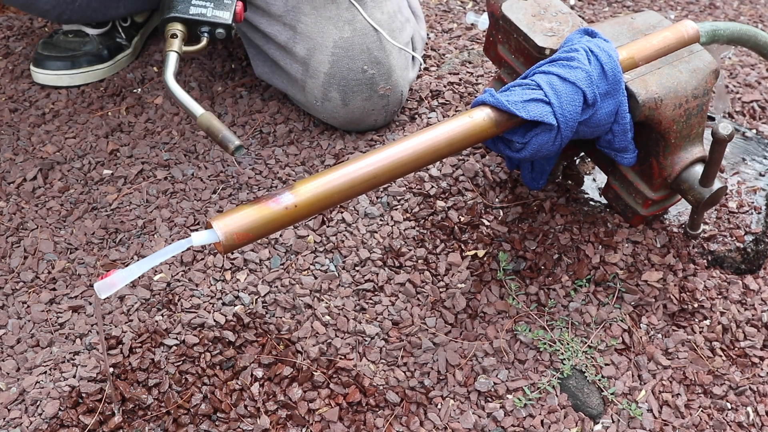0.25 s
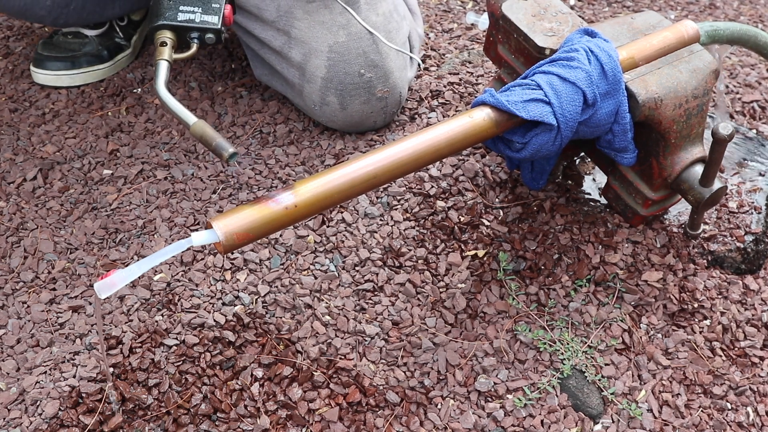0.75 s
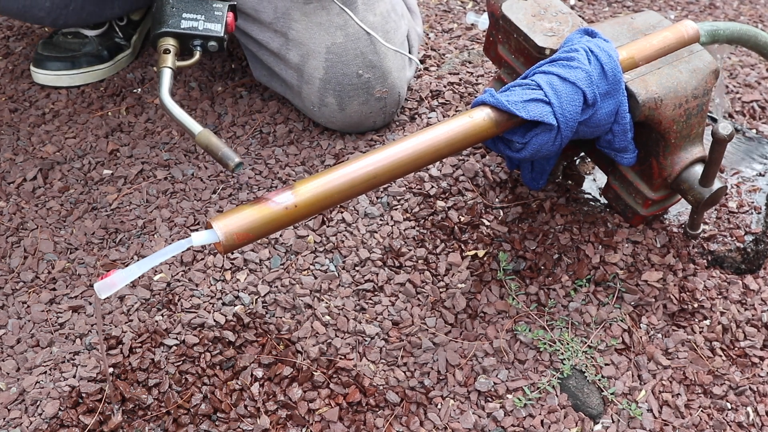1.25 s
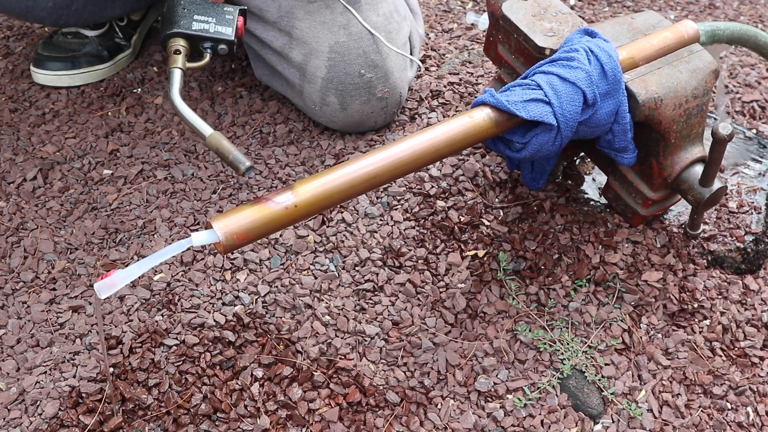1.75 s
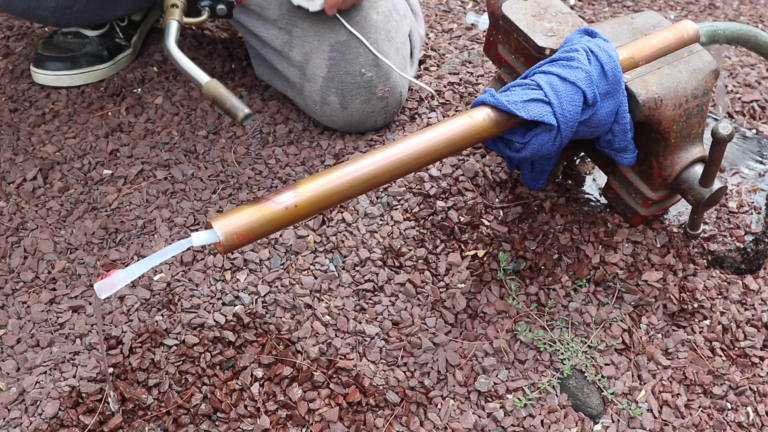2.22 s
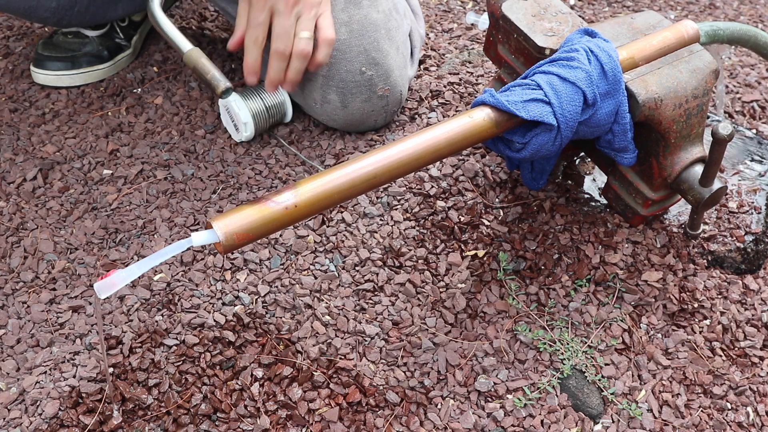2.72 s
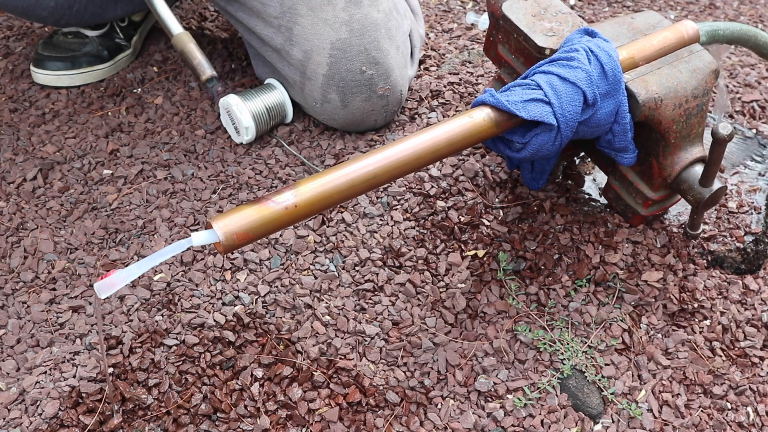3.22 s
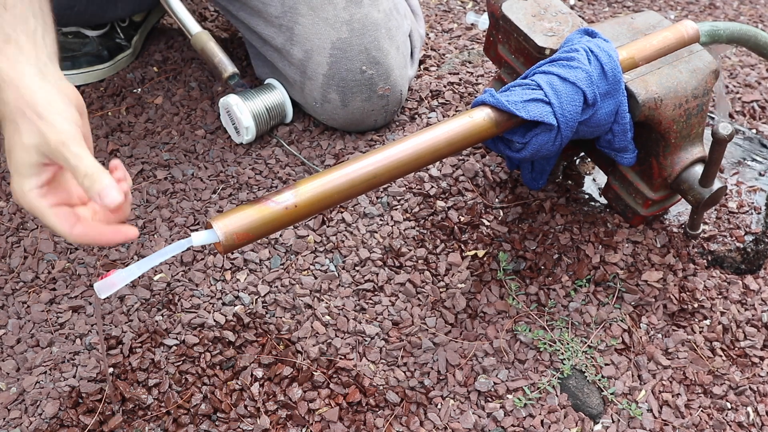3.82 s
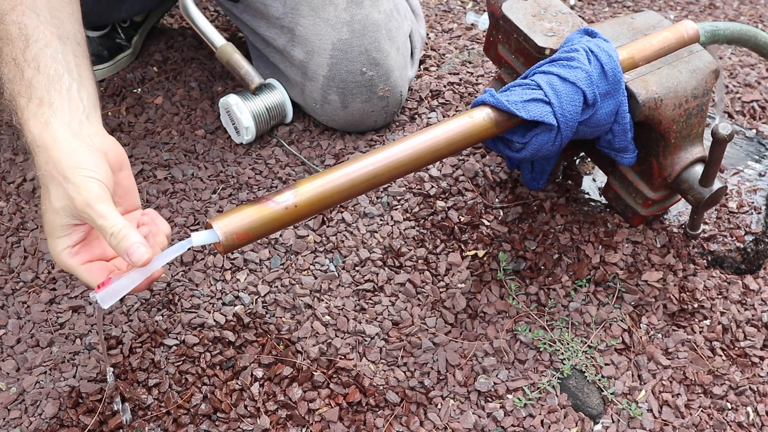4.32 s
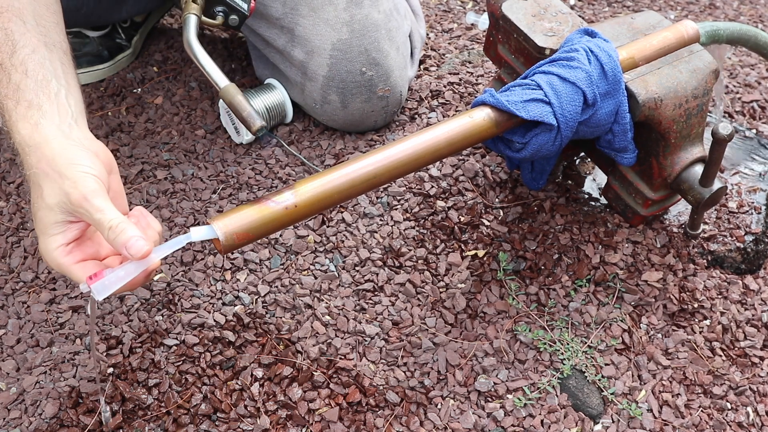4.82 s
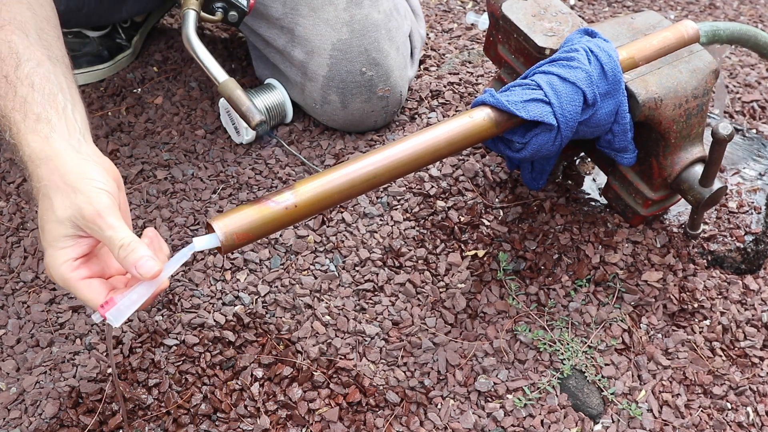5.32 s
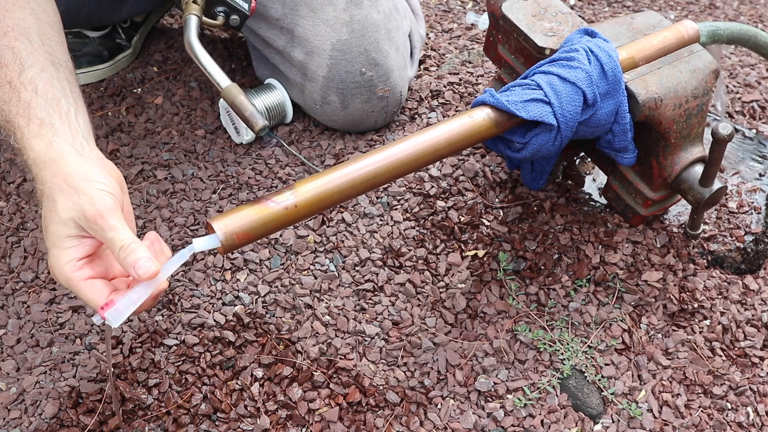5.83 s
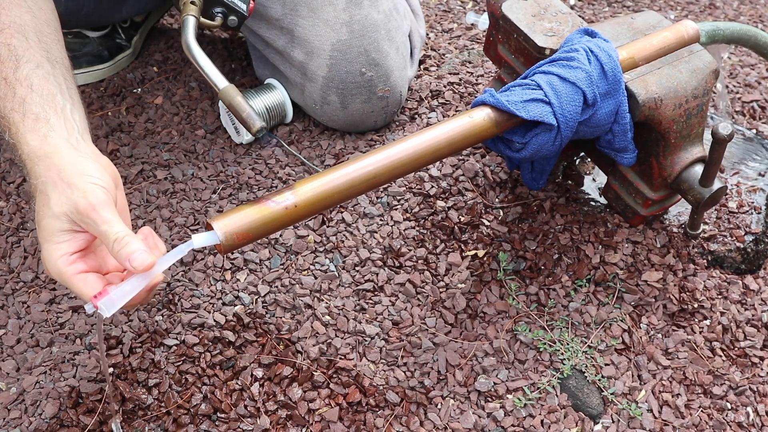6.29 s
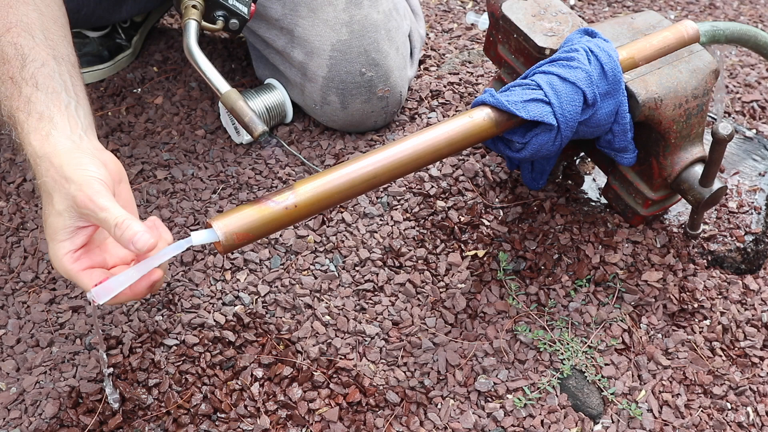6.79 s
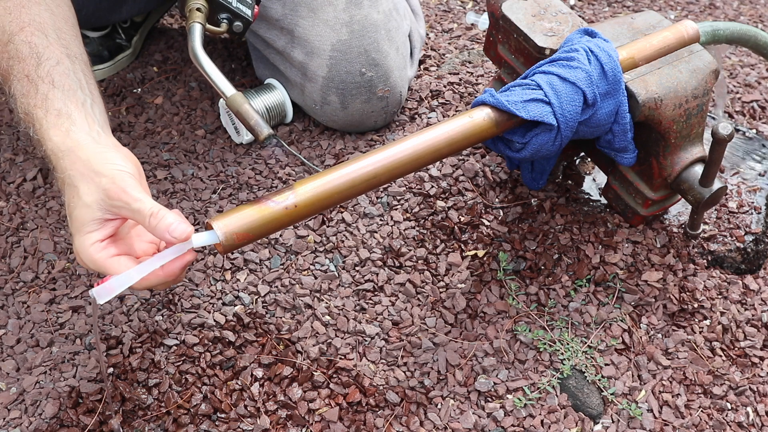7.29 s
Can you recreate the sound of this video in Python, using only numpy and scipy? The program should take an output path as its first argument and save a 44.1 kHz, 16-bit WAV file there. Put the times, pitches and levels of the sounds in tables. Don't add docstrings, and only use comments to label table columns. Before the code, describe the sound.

Outdoors above loose stones, a gas torch burns without pause about a metre from a stereo camera microphone. A broad, rushing mid-low roar dominates, with a softer gas-jet hiss and a very thin fizz above. Close echoes give a hollow, comb-like colour that glides most noticeably after two seconds as the torch moves. A faint distant motor hum swells briefly now and then.

```python
import sys
import numpy as np
from scipy import signal
from scipy.io import wavfile
from scipy.ndimage import uniform_filter1d, map_coordinates

SR = 44100
rng = np.random.default_rng(int(sys.argv[2]) if len(sys.argv) > 2 else 0)


def attenuation_scalar(level_db):
    decades = np.asarray(level_db, float) / 20
    return 10 ** decades


def to_wav(sig):
    pcm = np.clip(np.atleast_2d(sig), -1, 1) * 32767
    pcm = np.round(pcm).astype(np.int16)
    wavfile.write(sys.argv[1], SR, pcm.T)


N = 332955
FRAME = 1024
HOP = dict(nperseg=FRAME, noverlap=3 * FRAME // 4)
HZ = np.fft.rfftfreq(FRAME, 1 / SR)[:, None]
TIMES_S = signal.stft(np.zeros(N), SR, **HOP)[1]

# (time [s], half length [s], level [dB])
SWELLS = [
    (.05, .2, -44),
    (0.71, 0.16, -35),
    (1.25, 0.27, -40),
    (4.0, 0.13, -41),
    (5.605, 0.091, -36),
    (6.398, 0.59, -43),
]
# (time [s], jet facing the camera [dB], flame strength [dB])
TORCH = [(0, -.5, 0), (.3, -.5, -1), (.55, 0.4, 0), (1.0, -1, -1), (1.6, -2, -1), (2.08, -1.8, -1),
         (2.25, 0.5, 1), (2.8, 1, 0.4), (3.15, 0.7, 1), (3.9, 1, 1), (4.2, 2, 0.5), (4.68, 0.6, 1.5),
         (4.92, 0.2, -.5), (5.3, 0, 0.2), (6.2, -0.6, 0), (6.8, 0.1, 0), (7.1, 0.7, 0), (7.55, 0.5, -0.5)]
# (time [s], roar edge [dB], body notch depth [0-1], notch frequency [Hz])
AIM = [(0, -1, 0, 3600), (.3, -.5, .2, 3550), (.5, .3, .8, 3480), (.9, -1, .15, 3600), (2.1, -1, .1, 3800),
       (2.35, -1, .8, 3650), (2.7, .3, .8, 3520), (3.1, -.3, .1, 3600), (3.6, -.3, .75, 3550),
       (3.9, -.5, .4, 3530), (4.5, -.5, .35, 3560), (4.7, 2, .9, 3610), (6, 2, .9, 3615),
       (7.55, 1.5, .9, 3665)]
# (time [s], ground echo delay [ms], knee echo delay [ms], knee share [0-1])
POSE = [(0, .955, 1.63, .33), (.68, 1.05, 1.72, .38), (.95, .975, 1.66, .46), (1.5, .95, 1.63, .6),
        (2.06, .935, 1.61, .72), (2.2, 1.01, 1.67, .55), (2.42, 1.25, 1.8, .28), (2.65, 1.31, 1.85, .16),
        (3.0, 1.21, 1.86, .38), (3.3, 1.27, 1.9, .4), (3.5, 1.38, 1.97, .32), (3.75, 1.325, 1.99, .4),
        (4.4, 1.3, 1.97, .45), (4.85, 1.08, 1.87, .4), (5.5, 1.09, 1.87, .38), (6.5, 1.07, 1.85, .38),
        (7.2, 1.05, 1.82, .3), (7.55, 1.02, 1.8, .37)]
# (frequency [Hz], density [dB per Hz])
ROAR = [(28, -52), (48, -10.5), (80, -18), (130, -4), (200, -2), (330, -2), (550, 2.5), (800, 1),
        (1150, -3), (1600, -1.5), (2100, -4), (2600, -8.5), (3250, -19.5), (4300, -48)]
HISS = [(2800, 0), (3500, 1), (4300, 3.5), (5300, 4), (6500, 1.5), (7500, -2.5), (8500, -4.5), (9500, -8.5),
        (10400, -13.5), (11200, -17), (12500, -55)]
FIZZ = [(9500, -30), (10800, -4), (12000, 0), (13000, -2.5), (13800, -7), (14700, -8), (15100, -14),
        (15250, -60)]
# (frequency [Hz], likeness [0-1])
LIKENESS = [(100, .999), (400, .995), (700, .999), (1500, .996), (2500, .994), (3000, .9), (3600, .9),
            (4500, .85), (6500, .8), (8500, .55), (9700, .4), (11000, .65), (12500, .45), (14500, .5)]
# (frequency [Hz], left over right [dB])
LEFT_GAIN = [(3000, -4), (3500, 4), (3900, -2), (4500, 3.5), (5300, 4), (7000, 2), (10500, 3.5),
             (12300, 5.5), (14000, 1.2)]
# (frequency [Hz], left lead [rad])
LEFT_LEAD = [(3000, .3), (3500, 1.0), (3900, .7), (4500, .6), (6500, .9), (8000, 1.4), (10500, 2.8),
             (11300, 2.9), (12200, 1.5), (13200, 1.7), (14500, 2.5)]
# (frequency [Hz], width [Hz], left depth [0-1], right depth [0-1])
BODY_NOTCHES = [(3310, 120, .65, .65), (3950, 300, .05, .45)]
# (start [s], end [s], low [Hz], high [Hz])
JOINED = (2.65, 4.55, 4600, 6850)
# (frequency [Hz], level from the usual [dB])
GATE = [(100, -30.5), (400, -26), (600, -22), (2500, -20.5), (3350, -19), (3620, -11), (3850, -18.5),
        (6000, -17), (9000, -9.5), (11000, -5.5), (12500, -9), (14000, -6.5), (15000, -4)]


def along(points):
    hz, value = np.transpose(points)
    return np.interp(np.log(HZ + 1), np.log(hz + 1), value)


def curves(rows):
    time_s, *columns = np.transpose(rows)
    return [np.interp(TIMES_S, time_s, column) for column in columns]


def unit(x):
    return x / np.sqrt(np.mean(np.abs(x) ** 2))


def wobble(knots_per_s):
    return map_coordinates(rng.standard_normal(500), [TIMES_S * knots_per_s])


def late(delay_ms):
    return np.exp(-2j * np.pi * HZ * delay_ms / 1000)


def bell(center_hz, width_hz):
    return 1 / (1 + (2 * (HZ - center_hz) / width_hz) ** 2)


def turbulence(spectrum, patchy_db):
    z = signal.stft(rng.standard_normal((2, N)), **HOP)[2]
    patches = uniform_filter1d(rng.standard_normal(z.shape[1:]), size=14, axis=0)
    patches = uniform_filter1d(patches, size=10, axis=1)
    angle = np.arccos(np.clip(along(LIKENESS), 0, 1)) / 2
    mid = np.cos(angle) * z[0]
    side = np.sin(angle) * z[1]
    return np.array([mid + side, mid - side]) * attenuation_scalar(along(spectrum) + patchy_db * unit(patches))


def sound(frames, level_db):
    power = uniform_filter1d(np.mean(np.abs(frames) ** 2, axis=(0, 1)), size=120)
    gain = attenuation_scalar(level_db) / np.sqrt(power * FRAME / 3)
    return signal.istft(frames * gain, **HOP)[1][:, :N]


def ports():
    _, depth, notch_hz = curves(AIM)
    notch = depth * bell(notch_hz, 125)
    treble = np.clip((HZ - 2650) / 350, 0, 1)
    lead_rad = treble * along(LEFT_LEAD) + 2.3 * notch
    half = attenuation_scalar(treble * along(LEFT_GAIN) / 2) * np.exp(.5j * lead_rad)
    both = np.array([half, 1 / half]) * (1 - .72 * notch)
    ground_ms = curves(POSE)[0]
    low = np.clip((1.2 - ground_ms) / .1, .2, 1)
    for hz, width_hz, *depths in BODY_NOTCHES:
        both = both * (1 - low * np.array(depths)[:, None, None] * bell(hz, width_hz))
    return both


def motor():
    hum_hz, drift_hz, rough_db, rest_db = 87, 1.02, 1.5, -44
    t = np.arange(N) / SR
    pitch_hz = np.interp(t, TIMES_S, hum_hz + drift_hz * wobble(6))
    level = attenuation_scalar(rest_db)
    for time_s, half_s, swell_db in SWELLS:
        level = level + attenuation_scalar(swell_db) * np.exp(-((TIMES_S - time_s) / half_s) ** 4)
    level = np.interp(t, TIMES_S, level * attenuation_scalar(rough_db * wobble(8)))
    return level * np.sin(2 * np.pi * np.cumsum(pitch_hz) / SR)


def fizz(flutter_db):
    shaded_until_s, shade_db_per_khz, shade_from_hz = 2.24, -3.5, 11600
    hidden = np.clip((shaded_until_s - TIMES_S) / .1, 0, 1)
    shade = attenuation_scalar(hidden * shade_db_per_khz * np.clip(HZ - shade_from_hz, 0, None) / 1000)
    facing_db = curves(TORCH)[0]
    level_db = -59.5 + 1.1 * facing_db + 0.87 * flutter_db + .3 * wobble(13)
    return sound(turbulence(FIZZ, patchy_db=4.0) * shade * ports(), level_db)


def hiss(flutter_db):
    facing_db, ground_ms = curves(TORCH)[0], curves(POSE)[0]
    share_down, share_turned = 0.47, 0.27
    share = share_down + (share_turned - share_down) * curves(AIM)[1]
    blur = 1.4 / (1 + (HZ / 8000) ** 4)
    paths = 1 + blur * share * np.array([late(ground_ms), .85 * late(ground_ms + .01)])
    level_db = -36.5 + facing_db + 0.29 * flutter_db + 0.3 * wobble(14)
    return sound(turbulence(HISS, patchy_db=1.0) * paths * ports(), level_db)


def flame(flutter_db):
    ground_ms, knee_ms, knee_share = curves(POSE)
    top_share = 0.44
    soil_share = 0.41 - 0.57 * (ground_ms - 1)
    small_body = HZ ** 2 / (HZ ** 2 + 1200 ** 2)
    sharp = 1 / (1 + (HZ / 3600) ** 6)
    ground = top_share * late(ground_ms - .04) + soil_share * late(ground_ms + 0.18)
    knee = knee_share * small_body * late(knee_ms)
    paths = 1 + sharp * (ground + knee)
    scattered = attenuation_scalar(-24) * turbulence(ROAR, patchy_db=.3)
    roar = turbulence(ROAR, patchy_db=0.5) * paths + scattered
    edge = attenuation_scalar(curves(AIM)[0] * np.exp(-((HZ - 2650) / 350) ** 2))
    level_db = -21.5 + curves(TORCH)[1] + 0.82 * flutter_db
    return sound(roar * edge * ports(), level_db)


def scene():
    flutter_db = 0.075 * wobble(7.9) + 0.47 * wobble(20) + 0.4 * wobble(60)
    return motor() + fizz(flutter_db) + hiss(flutter_db) + flame(flutter_db)


def top_cut(x):
    return signal.sosfilt(signal.butter(12, 15040, fs=SR, output="sos"), x)


def record(dry):
    hz, t, z = signal.stft(dry, SR, nperseg=2 * FRAME)
    start_s, end_s, low_hz, high_hz = JOINED
    joined = ((hz > low_hz) & (hz < high_hz))[:, None] & (t > start_s) & (t < end_s)
    size = np.sqrt(uniform_filter1d(np.abs(z) ** 2, size=24, axis=1))
    z = np.where(joined, z[0] * size / size[0], z)
    pair = np.array([z[0] + z[1], z[0] - z[1]]) / 2
    bands = np.abs(pair[:, :-1].reshape(2, -1, 8, len(t))) ** 2
    power = uniform_filter1d(bands.mean(axis=2), size=2, axis=2)
    usual = uniform_filter1d(power.sum(axis=0).mean(axis=1), size=5)[:, None]
    gate_db = np.interp(hz[4::8], *np.transpose(GATE))[:, None]
    jitter_db = 2.2 * unit(uniform_filter1d(rng.standard_normal(power.shape), size=3, axis=2))
    is_open = power > usual * attenuation_scalar(2 * (gate_db + jitter_db))
    pair[:, :-1] *= np.repeat(is_open, 8, axis=1)
    left_right = np.array([pair[0] + pair[1], pair[0] - pair[1]])
    mix = signal.istft(left_right, nperseg=2 * FRAME)[1][:, :N]
    return top_cut(mix)


dry = scene()
out = record(dry)
to_wav(out)
```